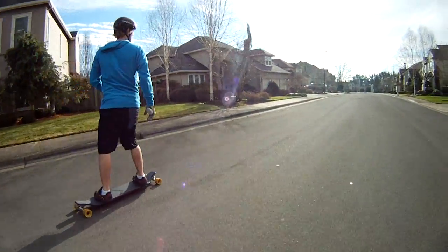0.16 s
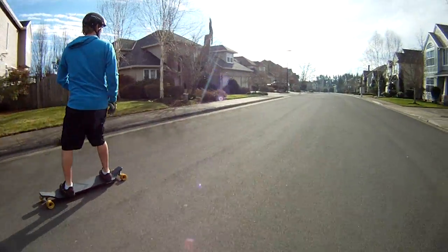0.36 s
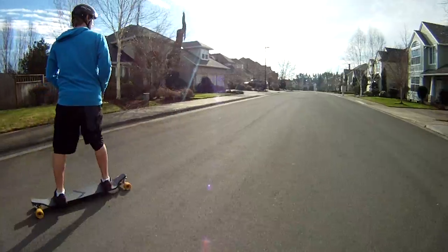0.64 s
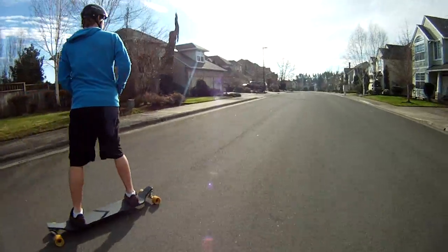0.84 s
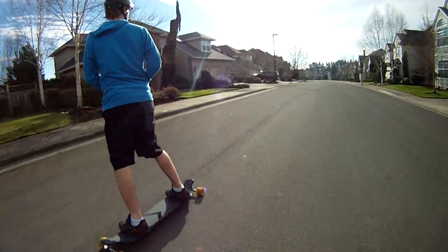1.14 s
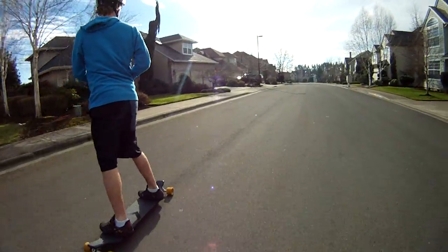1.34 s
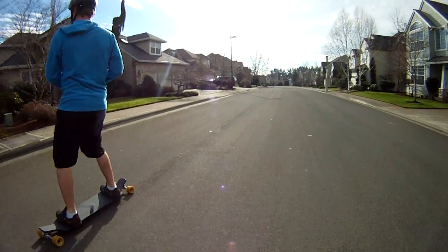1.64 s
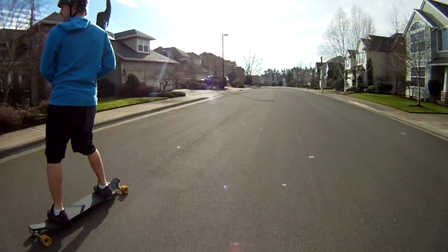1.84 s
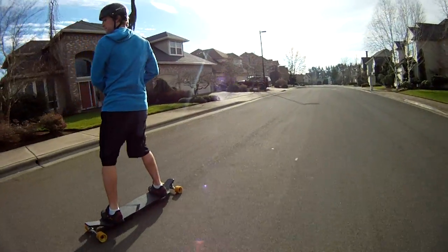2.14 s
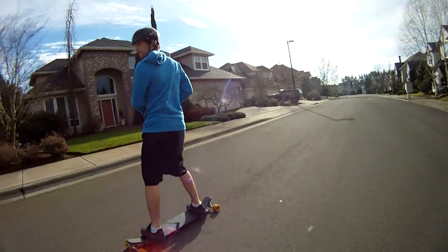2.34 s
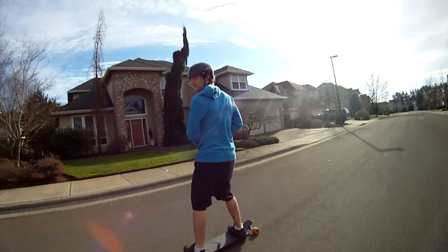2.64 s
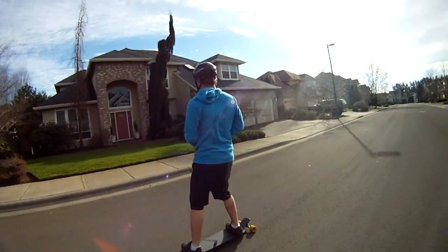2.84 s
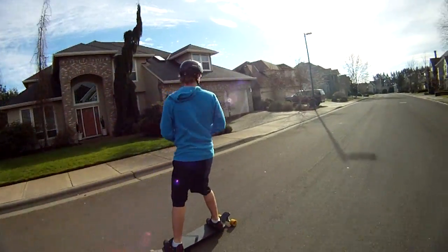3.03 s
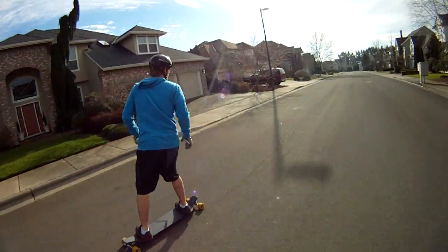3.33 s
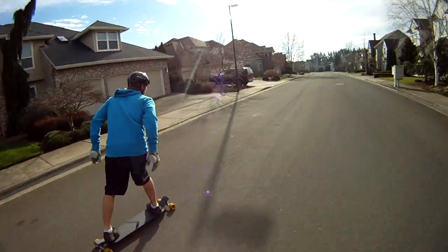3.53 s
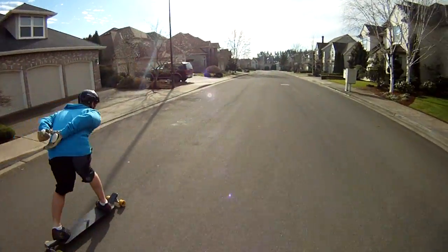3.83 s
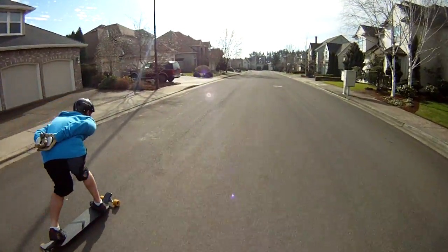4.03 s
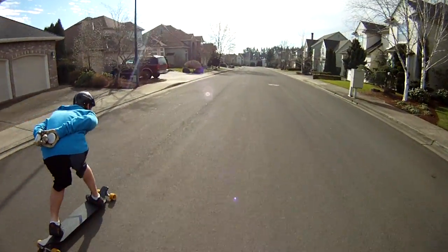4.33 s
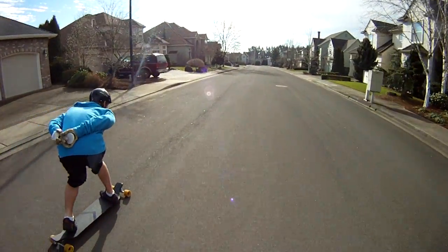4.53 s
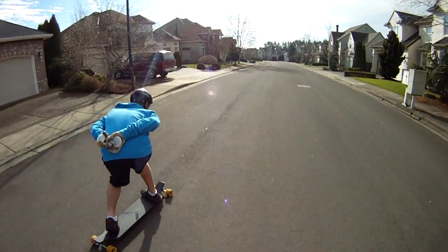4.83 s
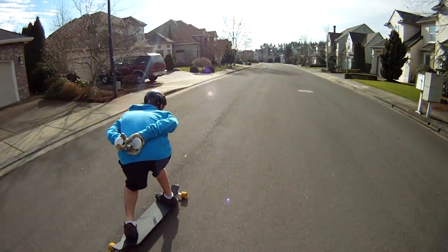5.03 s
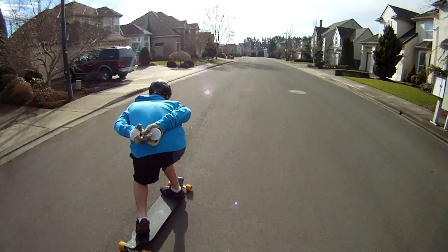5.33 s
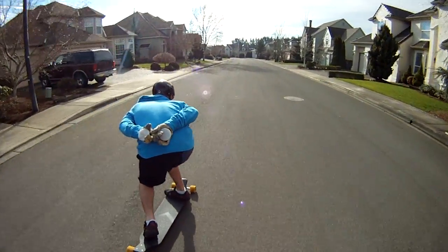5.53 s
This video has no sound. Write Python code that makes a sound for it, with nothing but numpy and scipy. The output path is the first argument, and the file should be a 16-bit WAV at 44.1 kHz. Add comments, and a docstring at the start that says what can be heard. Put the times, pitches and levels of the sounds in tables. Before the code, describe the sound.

Longboard wheels roar and hiss steadily on rough asphalt under buffeting wind, while a loose part clatters until it stops midway.

```python
"""An asphalt street: longboards roll downhill or along it, heard from a helmet camera in the wind.
Air rumbles, flutters and thumps at the microphone; the wheels roar, hum and hiss on the road grain,
and grit snaps under them. Something loose, probably in the camera mount, rattles the case's modes
until 2.6 s. The camera holds its samples, mirroring the sound into the treble."""
import sys
import numpy as np
from scipy import signal
from scipy.fft import rfft, irfft
from scipy.io import wavfile
from scipy.ndimage import uniform_filter1d

SR = 44100
rng = np.random.default_rng(int(sys.argv[2]) if len(sys.argv) > 2 else 0)


def store_wav(level_fs):
    """Save 16-bit WAV to argv[1]."""
    pcm = np.round(np.clip(np.atleast_2d(level_fs), -1, 1) * 32767)
    wavfile.write(sys.argv[1], SR, pcm.T.astype(np.int16))


N = 250032
TIME_S = np.arange(N) / SR

# Wheels on the road. Each row: time in s, roar in dB, hiss of the road grain in dB, both before trim.
ROLLING = [(0, -27, -32), (.3, -25, -35.5), (.6, -30, -34), (1.2, -26, -34.5), (2.45, -26.5, -35.5),
           (2.75, -30, -37), (3.05, -27, -35), (3.6, -27.5, -38), (3.85, -31, -38.5), (4.2, -29.5, -37.5),
           (4.5, -30.5, -35), (4.9, -32, -38), (5.4, -27.5, -34.5), (5.67, -31.5, -36)]
# Modes that grit rings. Each row: centre in Hz, bandwidth in Hz, relative level in dB.
GRIT_RESONANCES = [(1277, 140, 2.5), (1445, 84, 5), (1816, 55, -0.5), (2218, 41, -4.5), (2757, 250, -43)]
# Colour the case gives the rattle on its way to the microphone. Each row: frequency in Hz, gain in dB.
CASE_PATH = [(300, -32), (950, -4), (1420, -0.5), (1620, -8), (1780, 0), (2000, 1.5), (2450, -3),
             (3400, 0.5), (4000, -11.5), (5000, -13.5), (6000, -12)]


def amp(db):
    """Decibels to amplitude gain."""
    return 10 ** (np.asarray(db) / 20)


def evened(x):
    """Scales to rms 1."""
    return x / np.sqrt(np.mean(x ** 2) + 1e-20)


def steadied(x, size):
    """Divides by the rms over size samples: slow swells go, quick ones stay."""
    return x / np.sqrt(uniform_filter1d(x ** 2, size) + 1e-9)


def peaked(sound):
    """Scales the loudest 1.5 ms to rms 1."""
    return sound / np.sqrt(uniform_filter1d(sound ** 2, size=66).max())


def follow(rows):
    """The columns of a curve table, one value a sample."""
    s, *columns = np.transpose(rows)
    return [np.interp(TIME_S, s, column) for column in columns]


def coloured(x, spectrum):
    """Filters x by a spectrum drawn in dB over log frequency."""
    hz, db = np.transpose(spectrum)
    bins_hz = np.fft.rfftfreq(len(x), 1 / SR)
    gain = amp(np.interp(np.log(bins_hz + 1), np.log(hz), db))
    return irfft(rfft(x) * gain, len(x))


def noise(spectrum):
    """Gaussian noise of rms 1 with the given spectrum."""
    return evened(coloured(rng.standard_normal(N), spectrum))


def wander(hz):
    """Slow random curve of rms 1: noise low-passed at hz."""
    bins_hz = np.fft.rfftfreq(N, 1 / SR)
    return evened(irfft(rfft(rng.standard_normal(N)) / (1 + (bins_hz / hz) ** 4), N))


def add(mix, s, sound):
    """Mixes a sound in at s seconds."""
    part = mix[max(round(s * SR), 0):][:len(sound)]
    part += sound[:len(part)]


def ring(modes, size=1024):
    """Sum of decaying modes, detuned slightly for every point of contact."""
    hz, width_hz, db = np.transpose(modes)[:, :, None]
    t = TIME_S[:size]
    hz = hz * (1 + .007 * rng.standard_normal(hz.shape))
    decay = np.exp(-np.pi * width_hz * t)
    return (amp(db) * decay * np.sin(2 * np.pi * hz * t)).sum(0)


def struck(modes, contact_s, size=1024):
    """A flurry of tiny impacts swells and dies while the surfaces touch, and rings a set of modes."""
    u = 2 * TIME_S[:size] / contact_s
    contact = rng.standard_normal(size) * u * np.exp(-u)
    return evened(signal.fftconvolve(contact, ring(modes))[:size])


def wind(rumble_db=-1, eddies_db=-1, gusts_db=1.6, lumps_db=1.4, buffets_db=-1):
    """Large eddies rumble in gusts, small ones flutter, and a few big ones thump."""
    # Air pressing on the microphone. Each row: time in s, rumble in dB, flutter in dB, before trim.
    air_levels = [(0, -23.5, -27.5), (.3, -21, -22.5), (.55, -25.5, -24), (1.05, -20, -21.5),
                  (1.3, -25, -27.5), (1.7, -22, -21.5), (2.15, -22.5, -23), (2.45, -21, -24.5),
                  (2.85, -19.5, -19), (3.2, -21.5, -22.5), (3.55, -16.5, -20), (4.15, -19.5, -23),
                  (4.5, -20, -23.5), (4.9, -19.5, -24), (5.15, -24.5, -24.5), (5.67, -24.5, -24.5)]
    # Noise spectra of large and small eddies. Each row: frequency in Hz, relative dB per Hz.
    rumble_spectrum = [(8, -13), (22, -3.5), (40, -2), (65, 2.5), (110, -1.5), (170, -7), (300, -18),
                       (700, -74)]
    eddy_spectrum = [(60, -10), (120, -6), (170, -0.5), (250, -2.5), (380, -6), (520, -11.5), (900, -31),
                     (2500, -62)]
    # Single large eddies. Each row: centre in s, peak in dB before trim, pitch in Hz.
    big_eddies = [(1.08, -9, 150), (2.8, -9, 55), (2.879, -8, 60), (2.993, -10, 50), (3.126, -12, 103),
                  (3.49, -6, 78), (3.593, -11, 70), (3.738, -9, 101), (3.838, -4.5, 87), (3.951, -2.5, 107),
                  (4.166, -5, 93), (4.231, -5.5, 84.5), (4.858, -8.5, 58), (5.264, -9, 52)]
    rumble, flutter = follow(air_levels)
    rumble_gain = amp(rumble + rumble_db + gusts_db * wander(3.7))
    flutter_gain = amp(flutter + eddies_db + lumps_db * wander(29))
    air = rumble_gain * steadied(noise(rumble_spectrum), size=5000)
    air += flutter_gain * steadied(noise(eddy_spectrum), size=4000)
    for s, db, hz in big_eddies:
        u = np.pi * hz * (TIME_S - s)  # distance from the eddy's centre
        core = np.exp(-u ** 2)
        # a big eddy pushes the small ones aside and sucks at the port
        air = air * (1 - core) - amp(db + buffets_db) * (1 - 2 * u ** 2) * core
    return air


def hum(hz, width_hz, drift_hz=8):
    """A wheel resonance shaken by the road: a fuzzy tone of about rms 1 on a drifting pitch."""
    phase = 2 * np.pi * np.cumsum(hz + drift_hz * wander(3.98)) / SR
    tone = wander(width_hz) * np.cos(phase) + wander(width_hz) * np.sin(phase)
    return steadied(tone, size=3000)


def wheels(road, roar_db=2, hum_db=-3, bumps_db=1.6, hum_bumps_db=1.1):
    """Road grain shakes the wheels: a broad roar with narrow hums in it."""
    # Lower hum. Each row: time in s, level in dB before trim.
    hum_levels = [(0, -27), (.55, -24), (.85, -29), (1.35, -21.5), (2.6, -24), (3.3, -29.5), (4.0, -34.5)]
    # Noise spectrum of the roar. Each row: frequency in Hz, relative dB per Hz.
    roar_spectrum = [(200, -28), (380, -9.5), (480, -1), (570, 2), (660, -4), (770, -7.5), (900, -16),
                     (1200, -18), (2000, -47), (4000, -40.5)]
    high_hum_hz, high_hum_db, high_hum_s = 609, -28, .45  # soon dies away
    (roar, _), (level,) = follow(ROLLING), follow(hum_levels)
    body = amp(roar + roar_db + bumps_db * road) * steadied(noise(roar_spectrum), size=5000)
    low = amp(level + hum_db + hum_bumps_db * road) * hum(491.6, width_hz=30.3)
    fade = np.exp(-(TIME_S / high_hum_s) ** 4)
    high = amp(high_hum_db) * fade * hum(high_hum_hz, width_hz=10)
    return body + low + high


def hiss(road, hiss_db=0.74, flicker_db=1.37, swell_db=0.74, grains_per_s=350, spread_db=4):
    """Fine rush that flickers with the road surface, and the crackle of its small stones."""
    # Noise spectrum of the rush. Each row: frequency in Hz, relative dB per Hz.
    rush_spectrum = [(500, -2.5), (1000, -9.5), (1160, -13), (1270, 2.5), (1480, -3.5), (1650, -2.5),
                     (1850, -5), (2020, -4), (2220, -1.5), (2520, -8.5), (2900, -6), (3400, -12.5),
                     (4100, -24), (6000, -27.5)]
    coarse_from_s, coarse_early, coarse_late = 3.6, 0.16, 0.47  # power share of crackle; road coarsens
    _, level = follow(ROLLING)
    share = np.interp(TIME_S, [coarse_from_s, TIME_S[-1]], [coarse_early, coarse_late])
    sizes = amp(spread_db * np.minimum(rng.exponential(1, N), 3))
    stones = sizes * (rng.random(N) < grains_per_s / SR) * rng.choice([-1, 1], N)
    crackle = evened(signal.oaconvolve(stones, ring(GRIT_RESONANCES))[:N])
    gain = amp(level + hiss_db + flicker_db * road + swell_db * wander(13))
    return gain * (np.sqrt(1 - share) * noise(rush_spectrum) + np.sqrt(share) * crackle)


def knock(s, db, low_db):
    """The loose part hits the case: contact point sets the low modes; harder is shorter, brighter."""
    # Modes of the rattling case. Each row: centre in Hz, bandwidth in Hz, relative level in dB.
    low_modes = [(1480, 99, -7), (1814, 110, 7), (1905, 130, -2.5), (2200, 60, -7.5)]
    high_modes = [(2700, 140, 7.6), (2884, 127, 9), (3040, 115, 3), (3290, 140, 1)]
    top_modes = [(3900, 200, -1), (4480, 180, 0)]
    full_contact_s, shorter_per_db = 0.0011, 0.05  # contact at 0 dB; softer knocks last longer
    softest_db = -11.5  # below this the contact grows no longer
    jam_s, jam_top_db = 2.45, 10.5  # from here the part jams into its seat and rings the top more
    contact_s = full_contact_s * np.exp(-shorter_per_db * max(db, softest_db))
    low, high, top = (struck(modes, contact_s) for modes in (low_modes, high_modes, top_modes))
    top_db = -7 + 0.4 * db + jam_top_db * (s > jam_s)  # softer knocks ring the top modes less
    return amp(db) * peaked(amp(low_db) * low + high + amp(top_db) * top)


def chatter(chatter_db=0, per_s=135, jitter=.35, spread_db=4.5, low_db=-1, low_spread_db=4,
            seating_low_db=8, seating_s=0.88, seats_s=2.62, count=420):
    """Between knocks the part keeps bouncing lightly, at an uneven pace, and rings lower as it seats."""
    # Strength of the shaking. Each row: time in s, level in dB before trim and spread.
    shake_levels = [(0, -30), (.12, -30), (.22, -16.5), (.31, -26.5), (.45, -37.5), (.7, -32.5),
                    (1.0, -26.5), (1.4, -28), (1.75, -31), (1.87, -24.5), (1.99, -37), (2.14, -23.5),
                    (2.36, -27), (2.55, -26.5), (2.63, -32)]
    out = np.zeros(N)
    draws = np.clip(rng.standard_normal((count, 3)), -2, 2)
    for k, (late, size, colour) in enumerate(draws):
        s = (k + jitter * late) / per_s
        if s < seats_s:
            db = np.interp(s, *np.transpose(shake_levels)) + chatter_db + spread_db * size
            colour_db = np.interp(s, [seats_s - seating_s, seats_s], [low_db, seating_low_db])
            add(out, s, knock(s, db, colour_db + low_spread_db * colour))
    return coloured(out, CASE_PATH)


def rattle(knocks_db=-2.5, low_db=-1):
    """The loose part's distinct knocks, coloured by the case."""
    # Loudest knocks. Each row: start in s, peak in dB, low over high modes in dB, both before trim.
    loud_knocks = [(0.0386, -8, 3), (.052, -12.5, 5), (.186, -11, -1), (0.204, -12.5, -2),
                   (.2109, -10.5, -8), (.223, -14, -1), (.232, -10.5, -7), (0.2381, -9, 0),
                   (0.2602, -10.5, 1), (0.267, -9.5, -6), (0.275, -12, 3), (0.3278, -14.5, -1),
                   (.374, -12, -6), (.5006, -13.5, 7), (.54, -15.5, -15), (0.625, -15.5, 5.5),
                   (0.797, -8.5, 1.5), (0.8423, -11.5, -7), (.853, -13.5, 5), (0.8793, -10.5, 1),
                   (.8854, -18.5, 9), (.935, -18.5, 15), (.9952, -17, -6), (1.112, -10, -2.5),
                   (1.133, -15, 7), (1.143, -18, -3), (1.181, -19, -17), (1.2218, -18, -9),
                   (1.367, -16, -3), (1.5294, -15, 5), (1.5928, -16, 17), (1.714, -15, 3),
                   (1.7209, -7.5, 5.5), (1.8205, -13, 3.5), (1.8629, -14, -1), (1.8835, -13.5, 4),
                   (1.9511, -3.5, -3.5), (1.9635, -1, -3), (1.9688, -9.5, 6), (2.022, -14, -1),
                   (2.066, -15.5, -4), (2.09, -12.5, 5), (2.135, -17, 9), (2.1632, -15, 7),
                   (2.1716, -10, 2.5), (2.183, -9.5, 4), (2.2332, -11.5, 8), (2.244, -15, 15),
                   (2.266, -12.5, 7), (2.276, -10, 14), (2.3029, -10, 5), (2.359, -15.5, 20),
                   (2.395, -15, 20), (2.4028, -12.5, 3.5), (2.4134, -14, 16), (2.4737, -14.5, 8),
                   (2.482, -11.5, 9), (2.517, -5, 6.5), (2.585, -17.5, 20), (2.6059, -15.5, 10)]
    out = np.zeros(N)
    for s, db, colour_db in loud_knocks:
        add(out, s, knock(s, db + knocks_db, colour_db + low_db))
    return coloured(out, CASE_PATH)


def grit(grit_db=-7.5, contact_s=0.0018):
    """Larger stones snap under a wheel, each a brief contact ringing the grit modes."""
    # Snaps. Each row: start in s, peak in dB before trim.
    snaps = [(2.769, -22), (3.109, -21.5), (3.78, -22), (4.134, -16.5), (4.147, -20), (4.512, -19),
             (4.588, -18.5), (4.691, -20.5), (4.742, -20), (4.864, -20), (5.186, -17.5), (5.378, -16),
             (5.388, -22), (5.445, -19)]
    out = np.zeros(N)
    for s, db in snaps:
        add(out, s, amp(db + grit_db) * peaked(struck(GRIT_RESONANCES, contact_s)))
    return out


def lull(centre_s=3.995, width_s=0.044, depth_db=-7.5):
    """Gain of the rolling sound, which dips briefly."""
    return amp(depth_db * np.exp(-((TIME_S - centre_s) / width_s) ** 2))


def scene():
    """Wind, wheels, grit and rattle at one microphone."""
    road = wander(37)  # rough and smooth patches of asphalt passing under the wheels
    rolling = lull() * (wheels(road) + hiss(road))
    return (wind() + rolling + chatter() + rattle() + grit())[None]


def record(dry, mirror_db=.5, hold_hz=12000, edge_hz=15400):
    """The camera samples slowly and holds each value, so the sound is mirrored about the hold rate."""
    dry = dry / (1 + (dry / .85) ** 6) ** (1 / 6)  # soft limit
    hz = np.fft.rfftfreq(N, 1 / SR)
    droop = np.sinc(hz / hold_hz)  # response of holding a sample
    band = 1 / (1 + (hz / 5700) ** 24)  # low-pass ahead of sampling
    sampled = irfft(rfft(dry) * band / np.maximum(droop, .6), N)  # the droop is evened out in advance
    mirrored = sampled * (1 + 2 * amp(mirror_db) * np.cos(2 * np.pi * hold_hz * TIME_S))
    held = irfft(rfft(mirrored) * droop, N)
    low_pass = signal.firwin(511, edge_hz, window=("kaiser", 9), fs=SR)
    return signal.oaconvolve(held, low_pass[None], "same")


dry = scene()
out = record(dry)
store_wav(out)
```